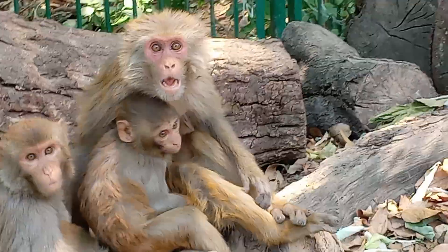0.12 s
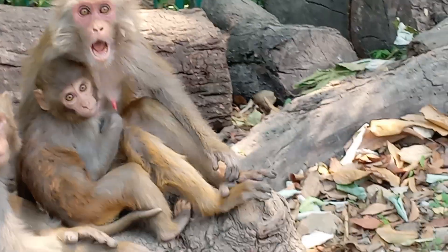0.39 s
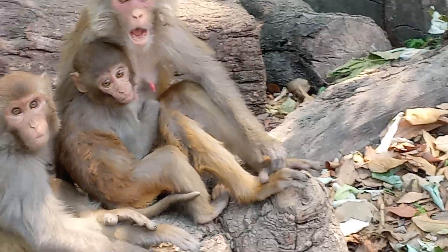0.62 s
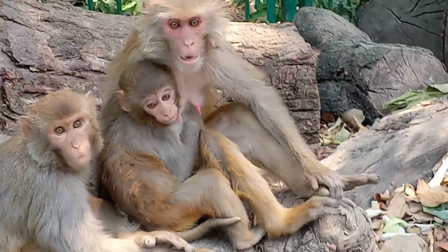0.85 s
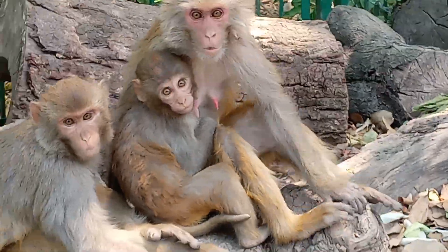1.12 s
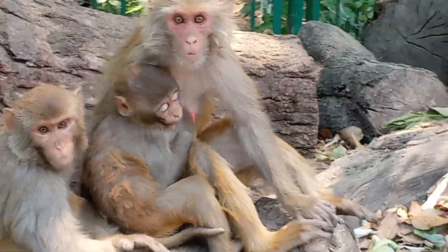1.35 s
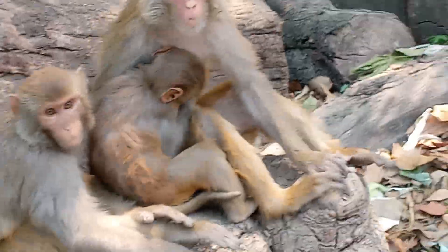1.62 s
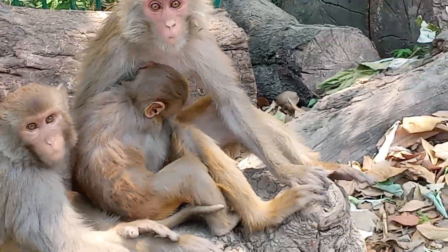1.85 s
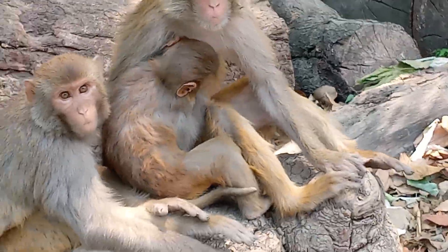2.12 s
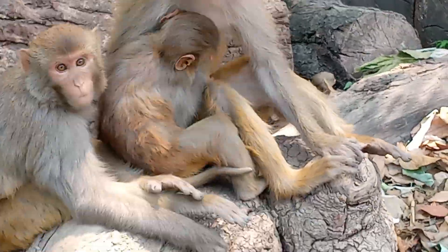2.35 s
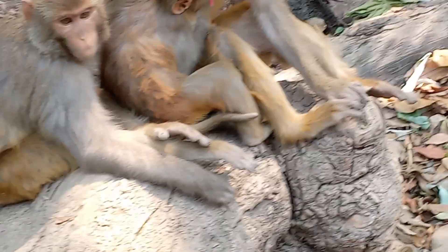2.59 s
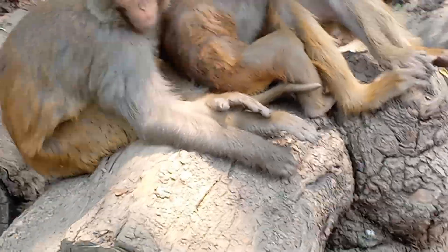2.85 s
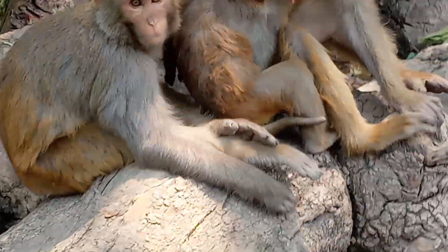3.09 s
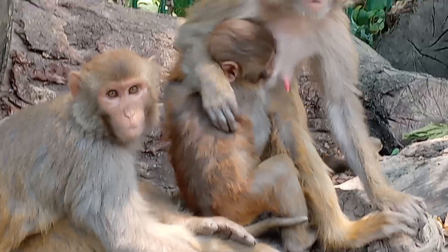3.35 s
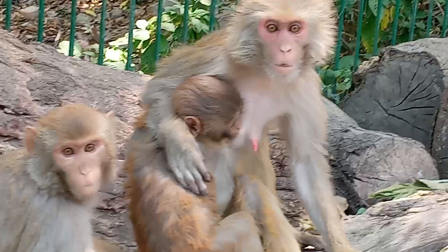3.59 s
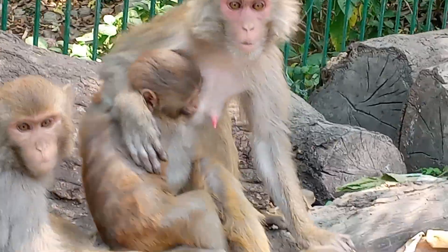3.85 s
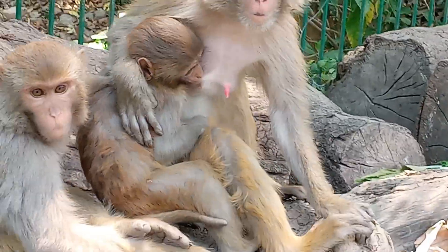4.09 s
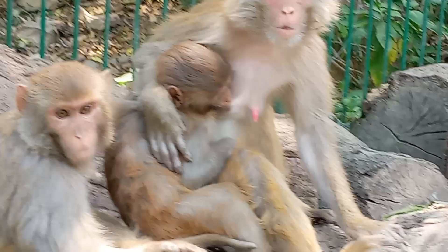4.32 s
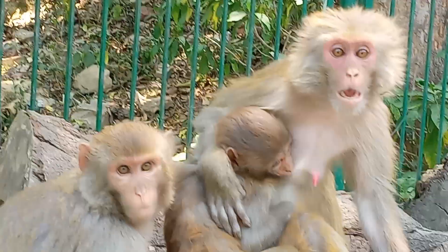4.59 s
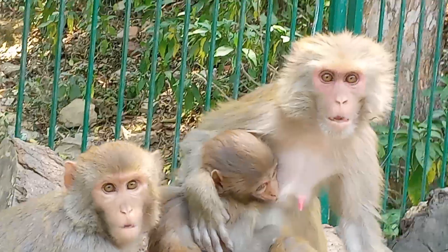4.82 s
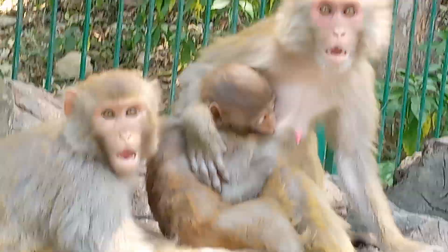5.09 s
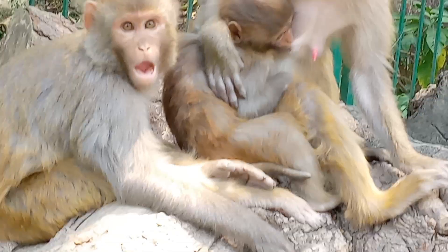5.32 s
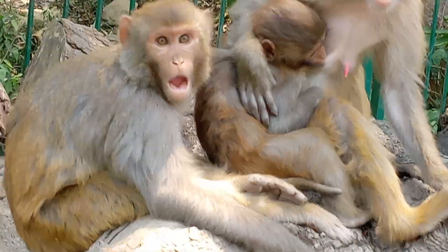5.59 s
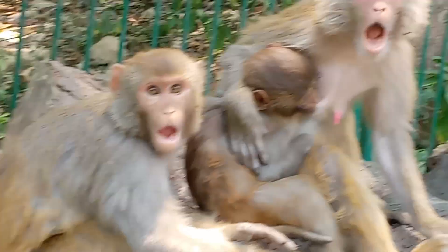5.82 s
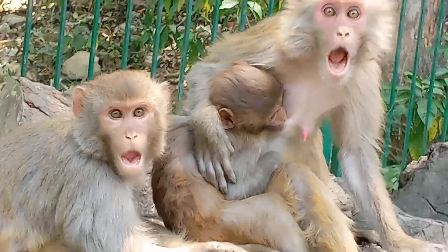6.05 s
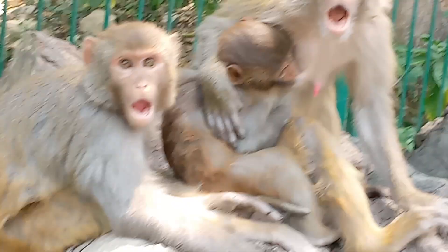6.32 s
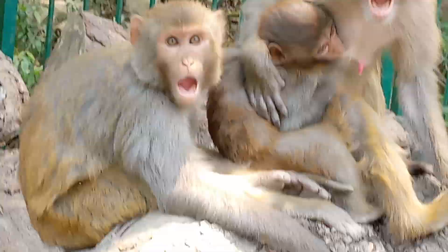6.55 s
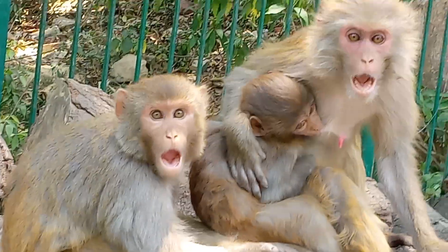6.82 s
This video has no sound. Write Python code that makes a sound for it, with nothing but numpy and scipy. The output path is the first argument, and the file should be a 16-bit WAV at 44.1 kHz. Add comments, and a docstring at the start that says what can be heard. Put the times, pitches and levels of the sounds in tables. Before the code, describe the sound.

Leaves crackle and twigs snap near the microphone, strongest in the first second, with dull foot thuds on wood. A faint distant horn wavers briefly at the start. The middle is sparse: light ticks, quiet scuffs, a far bird's triple note about once a second. Near the end a fresh flurry of snaps leads to a short rough bark and soft breaths. Open air, slightly dull stereo, distant traffic, right side ringing brightly.

```python
"""Out of doors, over traffic rumble and hiss: at once twigs snap, a foot thuds, leaves swish; a far horn wavers for 0.68 s.
From 0.9 s a far bird repeats three short notes, while monkeys go on scuffing, snapping and thudding on logs and leaves.
Near 6.2 s one animal barks, then pants, amid more snaps. Leaves are clicks ringing in small resonances, snaps are noise
bursts, thuds are damped sines, calls are noise in throat bands. The right microphone port rings near 4 kHz."""
import sys
import numpy as np
from scipy import signal
from scipy.fft import rfft, irfft, next_fast_len
from scipy.io import wavfile
from scipy.ndimage import uniform_filter1d

SR = 44100
rng = np.random.default_rng(int(sys.argv[2]) if len(sys.argv) > 2 else 0)


def to_wav(sig):
    """Store sig (one row per channel, or 1-D mono) as 16-bit WAV at the path in sys.argv[1].

    Samples outside -1..1 are clipped; the rate is SR.
    """
    pcm = np.clip(np.atleast_2d(sig), -1, 1) * 32767
    pcm = np.round(pcm).astype(np.int16)
    wavfile.write(sys.argv[1], SR, pcm.T)  # frames by channels


def amplitude_ratio(level_db):
    """Convert a level in decibels to the matching linear amplitude (field) ratio."""
    exponent = np.asarray(level_db, float) / 20
    return 10 ** exponent


N = 305833


def rms_one(x):
    """Scale to rms 1."""
    return x / np.sqrt(np.mean(x ** 2) + 1e-20)


def in_time(rows):
    """Columns of a table as curves over all samples."""
    time_s, *columns = np.transpose(rows)
    return [np.interp(np.arange(N) / SR, time_s, column) for column in columns]


def at_hz(points, hz):
    """Read a table on a log-frequency axis."""
    table_hz, values = np.transpose(points)
    return np.interp(np.log(hz + 1), np.log(table_hz), values)


def drift(rate_hz):
    """Slow chance of spread 1: noise through two equal poles at rate_hz, run at SR / 40."""
    r = np.exp(-80 * np.pi * rate_hz / SR)
    noise = rng.standard_normal(N // 40 + 2002)
    slow = signal.lfilter([1], [1, -2 * r, r * r], noise)[2000:]
    return np.interp(np.arange(N) / 40, np.arange(len(slow)), rms_one(slow))


def swells(rows):
    """Gain of events that rise to a rounded peak and fall again, summed in power on a 1 ms grid."""
    t, power = np.arange(0, N / SR + .002, .001), 0
    for peak_s, peak_db, rise_s, fall_s in rows:
        away = np.maximum((peak_s - t) / max(rise_s, .003), (t - peak_s) / max(fall_s, .003))
        power = power + amplitude_ratio(peak_db - 20 * away ** 1.265) ** 2   # exponent 1 = pointed, 2 = dome
    return np.interp(np.arange(N) / SR, t, np.sqrt(power))


def cut(x, hz, kind, order=2):
    """Butterworth low- or high-pass."""
    return signal.sosfilt(signal.butter(order, hz, kind, fs=SR, output="sos"), x)


def resonance(x, hz, width_hz):
    """Two-pole resonance, gain 1 on top."""
    r = np.exp(-np.pi * width_hz / SR)
    top_gain = (1 - r * r) / 2
    poles = [1, -2 * r * np.cos(2 * np.pi * hz / SR), r * r]
    return signal.lfilter(np.array([1, 0, -1]) * top_gain, poles, x)


def placed(x, pan_db=0):
    """A point source reaches the right port first; pan_db is left over right."""
    left_lag_s = 0.00013
    late = np.interp(np.arange(N) - left_lag_s * SR, np.arange(N), x)
    return np.array([late * amplitude_ratio(pan_db / 2), x * amplitude_ratio(-pan_db / 2)])


# left-right likeness of diffuse sound: freq_hz, correlation
PORT_LIKENESS = [(60, 0.68), (240, 0.82), (500, 0.13), (1000, 0.0092), (8000, 0.0091)]


def diffuse(spectrum):
    """Stereo noise from all around, alike in the bass only; rms 1."""
    size = next_fast_len(N)
    hz = np.arange(size // 2 + 1) * SR / size
    mid, side = rfft(rng.standard_normal((2, size)))
    alike = np.clip(at_hz(PORT_LIKENESS, hz), -1, 1)
    both = np.sqrt(1 + alike) * mid + np.sqrt(1 - alike) * side * [[1], [-1]]
    return rms_one(irfft(both * amplitude_ratio(at_hz(spectrum, hz)), size)[:, :N])


def crackle(per_s, uneven_db, clumps_db):
    """Clicks of uneven size in clumps, dealt to leaves of many sizes that each ring briefly; rms 1."""
    sizes = amplitude_ratio(uneven_db * np.minimum(rng.exponential(1, N), 5)) * rng.choice([-1, 1], N)
    clicks = sizes * (rng.random(N) < per_s / SR) * amplitude_ratio(clumps_db)
    pitches_hz = np.geomspace(300, 12000, 16)
    dealt = rng.integers(0, len(pitches_hz), N)
    total = amplitude_ratio(-4.0) * clicks
    for leaf, hz in enumerate(pitches_hz):
        ring = resonance(clicks * (dealt == leaf) + 1e-18, hz, .2 * hz)
        total = total + amplitude_ratio(4.5 * drift(14)) * ring
    return rms_one(total)


# limbs scuffing leaves: peak_s, peak_db, rise_20db_s, fall_20db_s, body_rel_db (rise, fall at least 0.003 s)
LEAF_SCUFFS = [(0.01, -27.5, 4, 0.0148, -3.5), (0.058, -37.5, 0.3, -0.01, -10),
               (0.24, -47.5, 0.9, 0.6, 3.5), (0.462, -46.5, -0.32, 1.7, -2), (0.555, -39, -0.21, 0.12, -6),
               (0.571, -38.5, -0.21, 0.28, -0.5), (0.758, -30, 0.0355, 0.06, 2),
               (0.796, -29.5, 0.05, 0.06, -1.5), (0.854, -31, 0.0854, -0.0048, -0.5),
               (0.89, -40.5, 0.32, -0.02, -5), (1.023, -48, 0.02, -0.04, 10),
               (1.076, -48, 0.43, -0.15, -0.5), (1.165, -47.5, 0.3, 0.16, -10), (1.254, -43, 0.1, 0, 6),
               (1.356, -37, 0.06, 0.0372, -1), (1.458, -44.5, 0.3, 0.03, 1.5), (1.611, -47, 0.24, 0.19, 1),
               (1.679, -45, -0.07, 0.04, 3), (1.786, -57, 0.3, 0, -6), (2.089, -55, 0.06, 0.14, -3.5),
               (2.385, -66, -0.86, 0.13, 15), (2.601, -48, .08, 0.1, -1), (2.96, -49, 0.04, 0.09, 6.5),
               (3.17, -59, 0.02, 0.13, 8.5), (3.29, -58.5, .04, .08, 4), (4.066, -57.5, 0.21, -0.1, 1),
               (4.21, -63, -0.04, -0.8, -6), (4.292, -59.5, 0.4, 0.42, 4), (4.365, -52, 0.17, 0.24, 0.5),
               (4.5, -52, 0.06, 0.01, 2), (5.726, -52.5, -0.06, 0.15, 0), (5.801, -35.5, 0.0633, 0.17, -12),
               (5.946, -46, 0.07, 0.17, -3), (6.025, -53, -0.13, 0.44, -0.5), (6.13, -55, -0.14, 0.27, 0),
               (6.187, -37, 0.0369, 0.0724, -2), (6.587, -47, 0.05, 0.18, -7.5),
               (6.683, -49, -0.02, 0.11, -1.5), (6.77, -55, -0.1, 0, 4)]
# faint litter stirring between scuffs: time_s, level_db
LITTER_STIR = [(0, -68.5), (1.75, -61.5), (1.88, -75), (2.2, -60), (2.27, -82), (2.37, -82.5), (2.5, -69),
               (3.4, -84), (4.04, -69.5), (4.17, -89), (4.55, -73.5), (4.92, -63), (5.3, -87.5),
               (5.63, -89.5), (6.24, -72), (6.49, -74), (6.75, -64.5), (6.93, -62)]


def rustle():
    """Leaves crackle; part of the sound arrives scattered, unlike in the two ports, mostly in the treble."""
    clumps_db = 2.6 * drift(45)
    direct, left, right = [crackle(4500, 3.9, clumps_db) for _ in range(3)]
    scattered = np.array([left, right])
    stir = amplitude_ratio(in_time(LITTER_STIR)[0])
    crisp_rows = [row[:4] for row in LEAF_SCUFFS]
    body_rows = [(s, db + body_db, rise, fall) for s, db, rise, fall, body_db in LEAF_SCUFFS]
    crisp_gain = np.hypot(stir, swells(crisp_rows))
    body_gain = np.hypot(stir * amplitude_ratio(3.5), swells(body_rows))
    crisp = cut(placed(direct) + amplitude_ratio(0.5) * scattered, 1430, "high")
    body = cut(cut(placed(direct) + amplitude_ratio(-26.5) * scattered, 2380, "low"), 310, "high")
    return crisp_gain * crisp + body_gain * body


# leaf and twig snaps: start_s, peak_db, centre_hz, left_over_right_db
TWIG_SNAPS = [(0.005, -20, 3000, 9), (0.012, -7, 5050, 1.5), (0.011, -14, 1820, -13), (0.202, -39, 4650, 8),
              (0.339, -39.5, 2770, -13), (0.448, -33.5, 5050, -3), (0.464, -28, 7500, 0),
              (0.571, -14.5, 930, -1), (0.573, -14, 4000, 2.5), (0.766, -26, 2260, -7.5),
              (0.879, -28.5, 4860, -4), (0.912, -30, 3400, -2), (0.939, -23.5, 4100, -2),
              (0.957, -32.5, 3830, -2), (0.988, -28.5, 1700, 0), (1.018, -25.5, 1680, 2),
              (1.071, -26.5, 3600, -5), (1.078, -30.5, 3180, -4.5), (1.096, -37, 3500, -3),
              (1.142, -25, 2730, 0), (1.156, -30.5, 2940, -4), (1.19, -28, 3000, -3),
              (1.392, -23, 5330, 11.5), (1.466, -26, 1990, -5), (1.781, -37, 4500, -3),
              (2.001, -39.5, 1830, -2), (2.078, -34, 5500, -7), (2.12, -35.5, 5240, -6),
              (2.15, -42, 5330, -8.5), (2.385, -66, 800, 0), (2.564, -33.5, 3500, -7),
              (2.572, -24, 6130, -7.5), (2.754, -39.5, 3340, -7), (2.952, -39, 4460, -0.5),
              (2.961, -27.5, 2240, 2), (2.978, -44, 2000, 5), (3.122, -40, 2010, 2.5),
              (3.16, -45.5, 4500, 1.5), (3.243, -35, 4500, 4.5), (3.261, -31.5, 2040, -2),
              (3.519, -49.5, 1200, 5), (3.767, -46, 5320, 1), (3.864, -45.5, 3600, -2),
              (4.017, -53, 5900, -3), (4.063, -37.5, 3680, 2), (4.094, -35, 6000, 6), (4.28, -33, 2960, 5),
              (4.5, -34, 5200, 17.5), (4.837, -39.5, 5010, -2), (5.655, -38.5, 3600, 5),
              (4.92, -44, 4530, 3), (5.086, -50, 5960, -1.5), (5.768, -27.5, 4350, 3),
              (5.789, -19.5, 4450, 2), (5.823, -26, 4600, 1), (5.847, -38.5, 5240, 14),
              (5.884, -32, 4500, 0), (5.941, -27.5, 5000, -1), (5.954, -33, 5000, -8),
              (5.961, -29.5, 4050, -1.5), (6.032, -36, 5500, -1.5), (6.121, -30.5, 4900, -4),
              (6.142, -29, 4540, 0.5), (6.177, -26.5, 4800, -2.5), (6.186, -20, 4950, -1.5),
              (6.2, -30, 4000, 5), (6.212, -33, 4300, 2), (6.678, -34.5, 5500, -11)]


def snaps():
    """Each snap is a sharp click with a dying burst of splinters, coloured by the size of what breaks."""
    out, t = np.zeros((2, N)), np.arange(round(.1 * SR)) / SR
    burst_t60_s = 0.017
    for start_s, peak_db, hz, pan_db in TWIG_SNAPS:
        burst = rng.standard_normal(len(t)) * amplitude_ratio(-60 * t / burst_t60_s)
        burst[0] += 5.0   # click
        burst = resonance(burst, hz, 0.39 * hz) + amplitude_ratio(-17) * burst
        port_db = peak_db + np.array([[pan_db], [-pan_db]]) / 2
        out[:, round(start_s * SR):][:, :len(t)] += burst / np.abs(burst).max() * amplitude_ratio(port_db)
    return np.array([placed(out[0])[0], out[1]])


# soft thuds of feet on wood: start_s, level_db, pitch_hz, t60_s
FOOT_THUDS = [(0.011, -29, 249, 0.066), (0.727, -32.5, 413, 0.037), (1.073, -43.5, 188, 0.13),
              (2.08, -45, 198, 0.056), (2.207, -48.5, 206, 0.079), (2.383, -53.5, 340, 0.12),
              (2.877, -43.5, 147, 0.08), (3.517, -44.5, 262, 0.078), (4.285, -50.5, 235, 0.11),
              (5.216, -52.5, 239, 0.12)]


def thuds():
    """A soft push rings a log briefly, with a dull noise puff."""
    out, t = np.zeros(N), np.arange(round(.15 * SR)) / SR
    onset_s = 0.0034
    for start_s, level_db, hz, t60_s in FOOT_THUDS:
        puff = cut(rng.standard_normal(len(t)), 1130, "low")
        fade = amplitude_ratio(level_db - 60 * t / t60_s) * (1 - np.exp(-t / onset_s))
        out[round(start_s * SR):][:len(t)] += fade * (np.sin(2 * np.pi * hz * t) + 2.2 * puff)
    return placed(out)


def breathy_call(calls, throat, flutter_db, pan_db, opening, wander):
    """Turbulent breath, fluttering in the larynx; throat resonances rise as effort opens the mouth, and wander."""
    effort = swells(calls)
    mouth = np.sqrt(effort / effort.max()) - .5
    flutter, voiced = amplitude_ratio(flutter_db * drift(120)), 0
    for hz, width_hz, level_db in throat:
        moving_hz = hz * (1 + opening * mouth + wander * drift(9.9))
        a, b = cut(rng.standard_normal((2, N)), 0.63 * width_hz, "low")
        phase = 2 * np.pi * np.cumsum(moving_hz) / SR
        voiced = voiced + amplitude_ratio(level_db) * (a * np.cos(phase) + b * np.sin(phase))
    voiced = voiced * flutter
    voiced /= np.sqrt(uniform_filter1d(voiced ** 2, size=700))   # slow swings evened out
    return placed(voiced * effort, pan_db)


# barks: peak_s, peak_db, rise_20db_s, fall_20db_s (rise, fall at least 0.003 s)
BARK_CALLS = [(6.191, -39.5, 0.0258, -0.03), (6.232, -31, 0.018, -0.0042), (6.241, -27, 0.0184, 0.0241)]
# throat resonances of the bark: centre_hz, width_hz, rel_db
BARK_FORMANTS = [(1298, 260, -4), (1740, 210, 0), (2270, 170, 7), (3940, 650, -10.5), (5100, 950, -14)]


def bark():
    """Short bursts of breath through a throat that opens markedly."""
    return breathy_call(BARK_CALLS, BARK_FORMANTS, flutter_db=-0.5, pan_db=-5.5, opening=.08, wander=.015)


# pants: peak_s, peak_db, rise_20db_s, fall_20db_s
PANT_CALLS = [(6.3, -60.5, 0.031, 0.084), (6.39, -53.5, 0.037, 0.32), (6.46, -53.5, 0.162, 0.021)]
# throat resonances of the pant: centre_hz, width_hz, rel_db
PANT_FORMANTS = [(955, 260, 3.3), (1490, 200, 4.3), (2420, 380, 7.1), (3340, 185, 6.3), (4070, 210, 0.5),
                 (4600, 180, 3)]


def pant():
    """Softer, slower breaths, with more flutter and a nearly fixed mouth."""
    return breathy_call(PANT_CALLS, PANT_FORMANTS, flutter_db=3.0, pan_db=2.5, opening=.01, wander=.012)


# bird phrases: start_s, level_db
BIRD_PHRASES = [(.94, -63), (1.955, -66), (2.945, -65), (3.91, -63), (4.915, -63), (5.97, -57)]
# notes of a phrase: after_start_s, length_s, first_hz, last_hz, rel_db
PHRASE_NOTES = [(0, .05, 1200, 1110, 0), (.075, .038, 1140, 1090, -1), (.145, .04, 1110, 1130, -2)]


def bird():
    """Near-sine gliding notes, smeared a little by echoes off the trees."""
    out = np.zeros(N)
    for start_s, level_db in BIRD_PHRASES:
        for after_s, length_s, first_hz, last_hz, rel_db in PHRASE_NOTES:
            count = round(length_s * SR)
            phase = 2 * np.pi * np.cumsum(np.linspace(first_hz, last_hz, count)) / SR
            note = amplitude_ratio(level_db + rel_db) * np.hanning(count) * np.sin(phase)
            out[round((start_s + after_s) * SR):][:count] += note
    left, right = [out + amplitude_ratio(-6) * np.roll(out, round(lag_s * SR)) for lag_s in (.017, .026)]
    # the bird sits to the left: the right port hears it about half a cycle late
    return np.array([left, np.roll(right, round(.0004 * SR))])


# far horn, ending at the last row: time_s, pitch_hz, level_db, octave_rel_db
FAR_HORN = [(0, 650, -61, -9), (.18, 643, -57, -6.5), (.24, 637, -57.5, 5), (.32, 628, -56.5, -0.5),
            (.47, 640, -55.5, 5), (.5, 639, -59, 1), (.525, 625, -54.5, -9), (.68, 618, -62, -8)]


def horn():
    """Two partials; the long path through moving air makes each flutter and break up, the lower one most."""
    hz, level_db, octave_db = in_time(FAR_HORN)
    phase = 2 * np.pi * np.cumsum(hz) / SR
    low = np.sin(phase + 2 * np.pi * np.cumsum(36 * drift(50)) / SR)
    high = np.sin(2 * phase + 2 * np.pi * np.cumsum(22 * drift(50)) / SR)
    flutter = amplitude_ratio([[5.5 * drift(30) for partial in range(2)] for port in range(2)])
    sounding = np.arange(N) < FAR_HORN[-1][0] * SR
    partials = flutter[:, 0] * low + flutter[:, 1] * amplitude_ratio(octave_db) * high
    return sounding * amplitude_ratio(level_db) * partials


def narrow_band(hz, width_hz):
    """Noise through the same resonance twice; rms 1."""
    noise = rng.standard_normal(N)
    return rms_one(resonance(resonance(noise, hz, width_hz), hz, width_hz))


# traffic rumble: time_s, level_db
RUMBLE_LEVEL = [(0.0, -62.5), (0.66, -56), (0.78, -50.5), (0.98, -64), (1.46, -60), (1.94, -66),
                (2.08, -59.5), (2.28, -71), (2.4, -61.5), (2.7, -61), (2.84, -68.5), (2.98, -64),
                (3.76, -66.5), (4.32, -61), (4.54, -63.5), (5.6, -65.5), (5.76, -62), (6.28, -61),
                (6.44, -63.5), (6.92, -63.5)]
# rumble spectrum: freq_hz, density_db (per Hz)
RUMBLE_SPECTRUM = [(20, -37.5), (40, -24.5), (65, 0), (90, -6), (130, -2.5), (220, -3), (400, -5),
                   (700, -9), (1100, -13.5), (2000, -23.5)]


def traffic():
    """Diffuse low rumble with a wavering narrow hum near 87 Hz."""
    rumble_db, = in_time(RUMBLE_LEVEL)
    engine = narrow_band(87.3, 24) * amplitude_ratio(-73.0 + 1.8 * drift(5.6))
    rumble = amplitude_ratio(rumble_db + 2.2 * drift(7)) * diffuse(RUMBLE_SPECTRUM)
    return rumble + engine


# low swells near 340 Hz, some hum, some the body of the loudest leaf scuffs: peak_s, peak_db
LOW_SWELLS = [(0.78, -56.5), (1.46, -63.5), (2.7, -55.5), (2.98, -62.5), (4.32, -60.5), (6.19, -60),
              (6.44, -62)]


def low_swells():
    """Wavering narrow noise near 340 Hz: some swells are hum, some the body of the loudest leaf scuffs."""
    rise_s, fall_s, rest_db = 0.079, 0.12, -77
    rows = [(peak_s, peak_db, rise_s, fall_s) for peak_s, peak_db in LOW_SWELLS]
    gain = amplitude_ratio(rest_db) + swells(rows)
    return gain * narrow_band(343.5, 45) * amplitude_ratio(2.5 * drift(22))


# far hiss spectrum: freq_hz, density_db (per Hz)
HISS_SPECTRUM = [(300, 19.5), (1000, 5.5), (2000, 9), (4000, 6), (6000, -26.5), (8000, -26.5), (11000, -14)]


def hiss():
    """Steady, diffuse far hiss."""
    return amplitude_ratio(-70) * diffuse(HISS_SPECTRUM)


def scene():
    """Animals close by, background far off."""
    animals = rustle() + snaps() + thuds() + bark() + pant()
    return animals + bird() + horn() + traffic() + low_swells() + hiss()


def low_pass(x):
    """Removes everything above the highest recorded frequency."""
    return signal.sosfilt(signal.butter(12, 15780, fs=SR, output="sos"), x)


# resonances of the right port: centre_hz, width_hz, boost_db
RIGHT_PORT_RINGS = [(3862, 812, 19), (5290, 450, 4), (3600, 21000, 0.5)]


def record(dry):
    """The right port rings; both ports lose deep bass, and treble steeply but for a faint remainder."""
    left, right = dry
    for hz, width_hz, boost_db in RIGHT_PORT_RINGS:
        right = right + (amplitude_ratio(boost_db) - 1) * resonance(right, hz, width_hz)
    ports = np.array([left, cut(right, 5780, "low", order=1)])
    heard = cut(cut(ports, 6080, "low", order=6), 3620, "low", order=1)
    # faint paths past the rings and the treble loss
    heard = heard + amplitude_ratio(-39) * cut(dry, 14500, "high", order=6)
    heard = heard + amplitude_ratio(-30) * cut(dry, 8500, "low", order=4) + amplitude_ratio(-47) * dry
    mix = cut(heard, 43, "high", order=3)
    return low_pass(mix)


dry = scene()
out = record(dry)
to_wav(out)
```